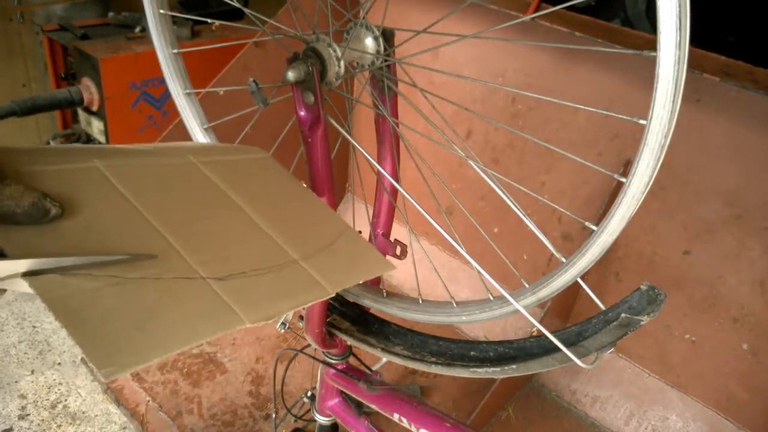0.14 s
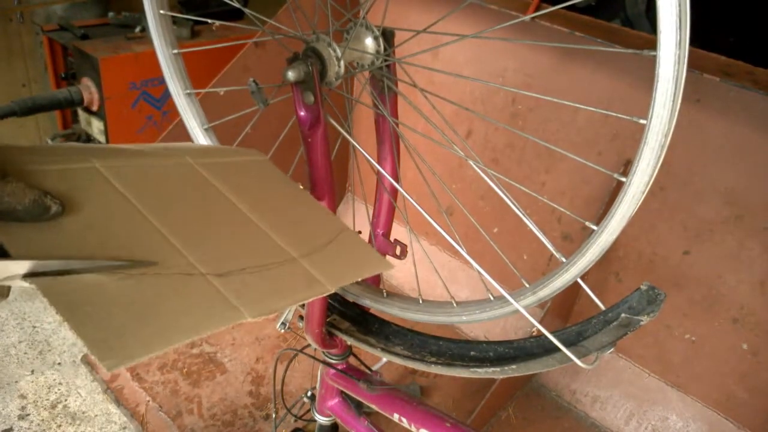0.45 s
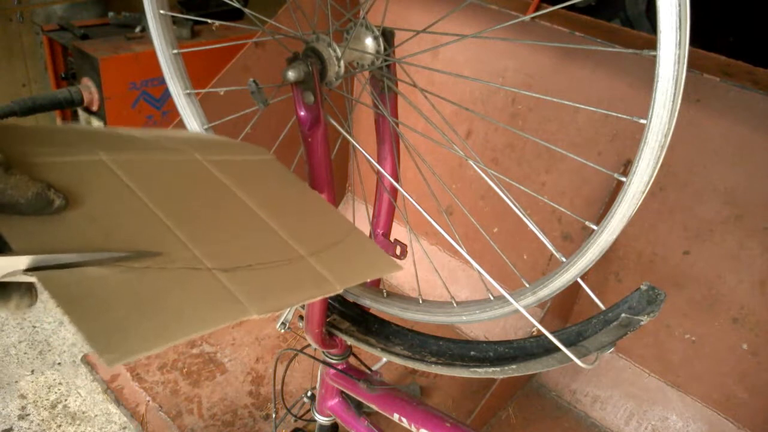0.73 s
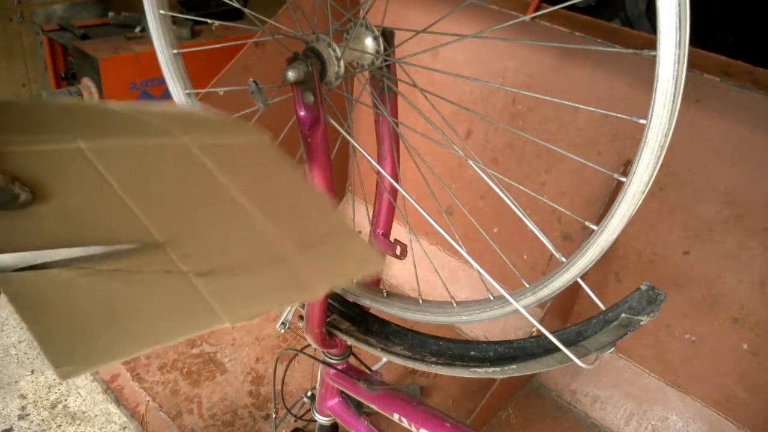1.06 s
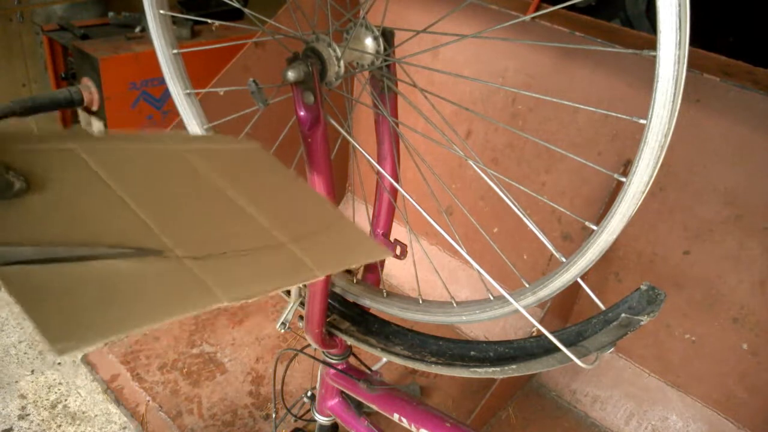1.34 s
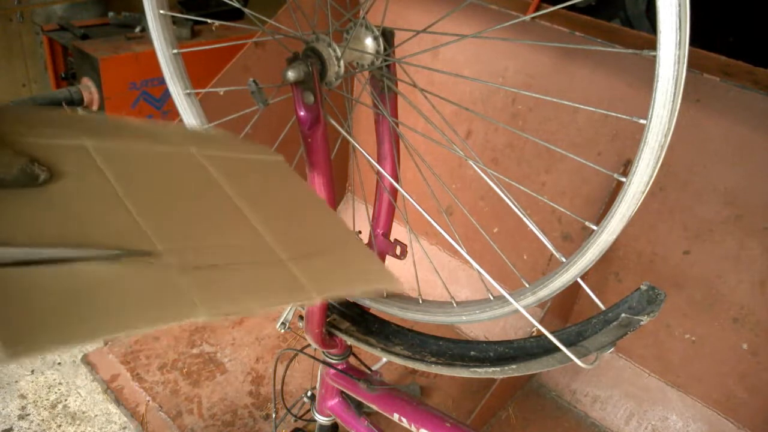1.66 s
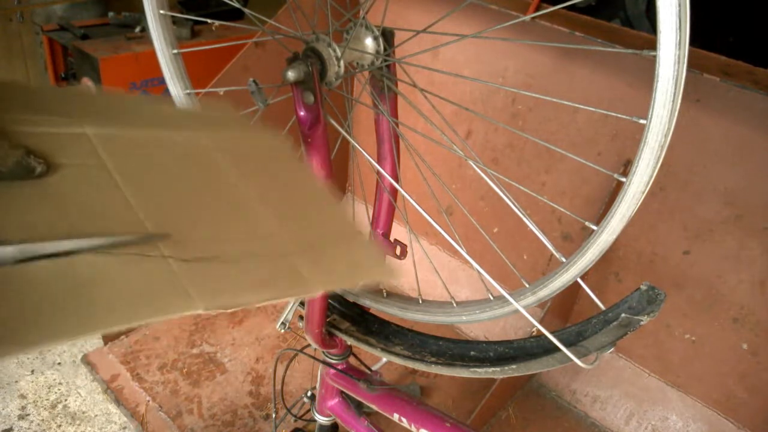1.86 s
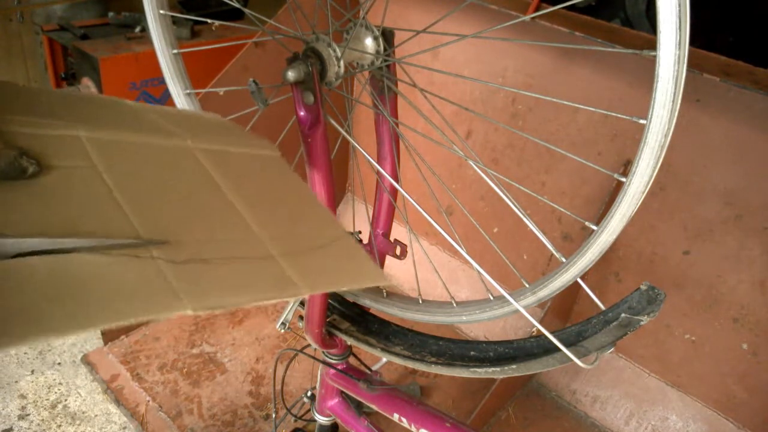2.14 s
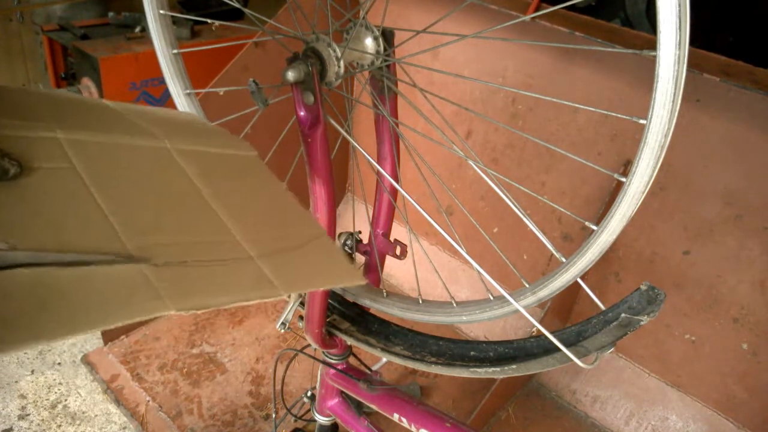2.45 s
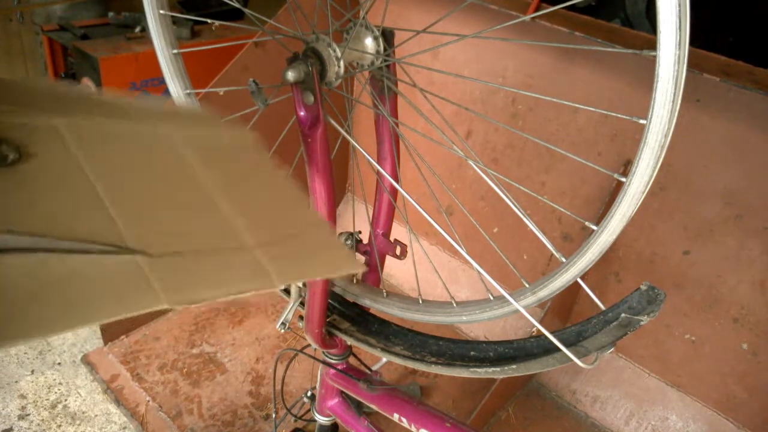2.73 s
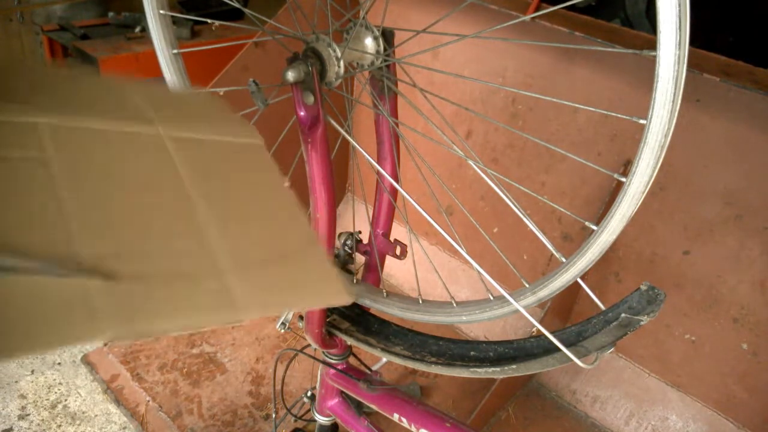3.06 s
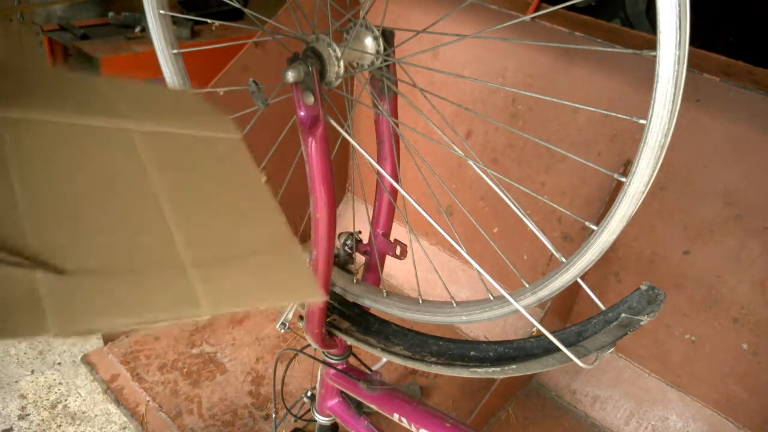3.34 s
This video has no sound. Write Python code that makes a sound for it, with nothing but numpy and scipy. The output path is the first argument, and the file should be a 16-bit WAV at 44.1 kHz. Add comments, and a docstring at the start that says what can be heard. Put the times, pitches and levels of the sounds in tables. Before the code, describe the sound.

Scissors cut corrugated cardboard close by in a small workshop. A light snip at 0.3 seconds is followed by soft blade sliding, then a thumping crunch at about 1.2 seconds. A dry scrape comes at 1.7 seconds, and two sharp crunches at 2.2 and 2.5. Another crackling cut at about 3.1 seconds trails into cardboard rubbing until 3.5. A quiet, low rumble lies underneath.

```python
"""Crunches, thumps and dry scrapes: scissors cut hand-held corrugated cardboard in a small workshop.
Each bite crushes fibres until the flutes (the wavy ridges inside) crack, making the sheet thump
and ring. Between bites the blades slide along the slit and the sheet rubs and creaks.
It all happens close by, over a quiet, low rumble."""
import sys
import numpy as np
from scipy import signal
from scipy.fft import rfft, irfft
from scipy.io import wavfile

SR = 44100
rng = np.random.default_rng(int(sys.argv[2]) if len(sys.argv) > 2 else 0)


def wav_out(sig):
    """Save sig, one row per channel (or a flat mono array), as 16-bit PCM at SR to the path in sys.argv[1]."""
    wavfile.write(sys.argv[1], SR, np.round(np.clip(np.atleast_2d(sig).T, -1, 1) * 32767).astype(np.int16))


N = 154350
TIME = np.arange(N) / SR
BITE_GRAINS_PER_S, BITE_SPREAD_DB = 2600, 2.83

# a flute gives way: t/s, length/s, thump/dB, hollow body/dB, crunch/dB, bright edge/dB
FLUTE_CRACKS = [(.331, 0.013, -43, -36.5, -42, -35), (0.4016, 0.0066, -55, -42, -49, -47.5),
                (1.122, 0.0051, -63, -68, -54, -56), (1.141, .013, -58, -38, -58, -34),
                (1.19, 0.011, -40, -41, -49, -35.5), (1.213, 0.0069, -46, -50, -56, -39),
                (1.2393, 0.0071, -25.5, -27, -29, -24.5), (1.256, 0.0035, -31.5, -37.5, -38, -45),
                (2.218, 0.0045, -64, -44, -41, -37.5), (2.232, 0.0091, -50, -35.5, -44, -43),
                (2.248, 0.0093, -38, -36.5, -22.5, -27.5), (2.2717, 0.0057, -41, -31.5, -33.5, -29),
                (2.428, 0.0064, -42, -37.5, -42, -44), (2.440, 0.0064, -39.5, -37, -61, -40.5),
                (2.479, 0.0072, -33, -21.5, -20, -21.5), (2.869, 0.0072, -74, -63, -57, -59.5),
                (3.09, 0.0092, -53, -34, -42, -44), (3.1224, 0.0046, -60, -23, -25, -31),
                (3.175, 0.0021, -42.5, -23.5, -54, -56)]
# tone colours of the cardboard (how strong each pitch is): f/Hz, level/dB
BODY_COLOUR = [(100, -27), (250, -5), (450, -8.5), (610, -1.5), (800, -6), (1100, -10), (1600, -21),
               (4000, -55)]
CRUNCH_COLOUR = [(300, -44.5), (900, -3.5), (1400, 0.5), (1900, 2.5), (2500, -2.5), (3400, -1), (4800, -3),
                 (7000, -5.5), (16000, -34.5)]
EDGE_COLOUR = [(800, -20.5), (2500, -7), (4300, -4), (6500, 3), (8500, -2), (11000, -1), (13500, -6.5),
               (16000, -13.5)]
HISS_COLOUR = [(800, -37), (2500, -10.5), (4000, -1), (6200, 1), (8200, 0), (10200, 2), (12500, -1.5),
               (16000, -10)]
# pitches at which the sheet rings: f/Hz, width/Hz, level/dB
SHEET_RINGS = [(171.3, 10, 8), (211.4, 8.1, -0.5), (604, 33, 3.5), (642, 22, -0.5), (730, 37, -12.5),
               (827, 62, -2.5), (1047, 9.3, -2.5), (1361, 18, -0.5), (1828, 39, -9), (1979, 50, -0.5),
               (2240, 87, -6.5), (3280, 17, -6), (3585, 130, -6.5), (4440, 95, -2.5), (5900, 120, -18.5)]


def from_db(db):
    """Turn decibels into a number to multiply by."""
    return 10 ** (np.asarray(db) / 20)


def rms_one(x):
    """Scale a signal so that its average strength (rms) is 1."""
    return x / np.sqrt(np.mean(x ** 2) + 1e-20)


def at_hz(table, hz, column=1):
    """Read between a table's rows along a pitch scale (log frequency)."""
    table = np.array(table)
    return np.interp(np.log(np.maximum(hz, 1)), np.log(table[:, 0]), table[:, column])


def swell(peak_s, rise_s, fall_s):
    """A smooth rise and fall around one moment."""
    distance = (TIME - peak_s) / np.where(TIME < peak_s, rise_s, fall_s)
    return np.exp(-np.minimum(distance ** 2, 20))


def resonate(x, hz, width_hz):
    """Make a signal ring at one pitch; a narrower width rings longer."""
    r = np.exp(-np.pi * width_hz / SR)
    gain = (1 - r * r) / 2
    feedback = [1, -2 * r * np.cos(2 * np.pi * hz / SR), r * r]
    return signal.lfilter([gain, 0, -gain], feedback, x + 1e-18)


def tap_response(colour, rings=(), size=8192):
    """The sound of one tap on something with this colour and these rings, scaled to energy 1."""
    freqs = np.arange(size // 2 + 1) * SR / size
    cepstrum = irfft(np.log(from_db(at_hz(colour, freqs))))
    # fold the second half onto the first, so nothing sounds before the tap
    cepstrum[1:size // 2] *= 2
    cepstrum[size // 2 + 1:] = 0
    tap = irfft(np.exp(rfft(cepstrum)))
    tap = tap + sum(from_db(db) * resonate(tap, hz, width) for hz, width, db in rings)
    return tap / np.sqrt(np.sum(tap ** 2))


def grains(per_s, spread_db):
    """Tiny breaks: clicks of uneven size at random moments."""
    sizes = from_db(spread_db * np.minimum(rng.exponential(1, N), 4))
    hits = rng.random(N) < per_s / SR
    return rms_one(hits * sizes * rng.choice([-1, 1], N))


def through_sheet(force, colour):
    """A force heard through the ringing cardboard."""
    return signal.fftconvolve(force, tap_response(colour, SHEET_RINGS))[:N]


def crackle(shapes, levels_db, colours, per_s, spread_db):
    """Grains follow each movement's loudness shape and sound through the sheet, one level per colour."""
    powers = from_db(levels_db).T ** 2 @ np.array(shapes) ** 2
    return sum(through_sheet(grains(per_s, spread_db) * np.sqrt(power), colour)
               for power, colour in zip(powers, colours))


def background(air_db=-59.5):
    """Quiet air with a wavering low rumble, and a low hum as the hand-held sheet flaps slowly."""
    # colour of the air's steady noise: f/Hz, level/dB
    air_colour = [(20, -6), (36, 1), (65, 1.5), (110, -6), (250, -9), (600, -12), (1200, -17),
                  (3000, -25.5), (8000, -31), (12500, -33), (16000, -33.5)]
    # low hums come and go (a distant rumble, and the sheet flapping in the hand near 1 s): peak t/s, rise/s,
    # fall/s, f/Hz, width/Hz, level/dB
    rumbles = [(1.4, 2.1, 2.4, 36, 5.7, -52.5), (1.03, 0.3, 0.34, 56, 3.6, -50.5)]
    air = signal.fftconvolve(rng.standard_normal(N + SR), tap_response(air_colour))
    out = from_db(air_db) * rms_one(air[SR:SR + N])
    for *timing, hz, width, db in rumbles:
        noise = rng.standard_normal(N + SR)
        rumble = resonate(resonate(noise, hz, width), hz, width)[SR:]
        out += from_db(db) * swell(*timing) * rms_one(rumble)
    return out


def workshop_echo(x, size=24000):
    """Sound bounces around the room, each band of pitches dying away at its own speed."""
    # the room's echo: f/Hz, time to fade by 60 dB/s, level/dB
    room = [(80, 0.099, -13), (245, 0.59, -9.5), (640, 0.24, -8.5), (1690, 0.3, -10.5), (3870, 0.25, -15),
            (8000, 0.17, -16.5), (15000, .13, -14.5)]
    t, tail = TIME[:size], 0
    edges_hz = np.geomspace(45, 18000, 11)
    fade_in = np.clip((t - .003) / 0.009, 0, 1)
    for low, high in zip(edges_hz, edges_hz[1:]):
        hz = np.sqrt(low * high)
        band_pass = signal.butter(2, [low, high], "band", fs=SR, output="sos")
        band = signal.sosfilt(band_pass, rng.standard_normal(size))
        band = band * fade_in * from_db(-60 * t / at_hz(room, hz))
        band *= np.sqrt(2 * (high - low) / SR / np.sum(band ** 2))  # energy in step with band width
        tail = tail + from_db(at_hz(room, hz, column=2)) * band
    return signal.fftconvolve(x, tail)[:N]


def creaks():
    """Card or steel catches as it rubs and briefly rings around one pitch; a few rows are the sheet itself
    ringing after a crack strikes it."""
    # a rub catches, or (the 2.488 s rows at 604 Hz and 208 Hz) the sheet rings after a crack strikes it: peak
    # t/s, rise/s, fall/s, f/Hz, width/Hz, level/dB
    catches = [(.036, .022, 0.016, 11500, 2500, -52), (.338, 0.014, 0.035, 610, 350, -45.5),
               (0.969, 0.058, 0.028, 2070, 900, -53.5), (1.21, 0.043, 0.092, 994, 344, -42.5),
               (1.575, .025, 0.029, 3060, 900, -49.5), (1.691, 0.068, 0.035, 1286, 200, -50),
               (1.74, 0.11, 0.025, 1060, 120, -49.5), (1.792, .02, 0.016, 1476, 200, -47),
               (2.136, 0.0054, 0.025, 6200, 900, -47), (2.265, 0.02, 0.047, 1960, 497, -44),
               (2.49, .008, 0.074, 1700, 1100, -41), (2.488, 0.0029, 0.041, 604, 109, -33.5),
               (2.488, 0.0066, .03, 208, 159, -39.5), (2.685, 0.022, 0.026, 580, 86, -48),
               (2.955, 0.011, 0.021, 11600, 2470, -42), (3.04, 0.032, .03, 603, 90, -55),
               (3.13, 0.0044, 0.07, 3060, 1990, -47)]
    out = 0
    for *timing, hz, width, db in catches:
        chafing = grains(BITE_GRAINS_PER_S, BITE_SPREAD_DB)
        ring = rms_one(resonate(resonate(chafing, hz, width), hz, width))
        out = out + from_db(db) * ring * swell(*timing)
    return out


def sheet_bounce(x, delay_s=0.00081, sway_share=0.21, sways_per_s=7, bounce_db=-13.5):
    """Sound bounces off the swaying sheet; the changing delay shifts its colour."""
    sway = np.interp(TIME * sways_per_s, np.arange(N), rng.uniform(-0.86, 1, N))
    delayed = np.interp(TIME - delay_s * (1 + sway_share * sway), TIME, x)
    gain = from_db(bounce_db)
    return (x - gain * delayed) / np.hypot(1, gain)


def slides(flutter_db=1.5, flutters_per_s=99):
    """Steel rubs on card, swelling with each push; uneven friction makes it flutter."""
    # pushes: peak t/s, rise/s, fall/s, hollow body/dB, rasp/dB, hiss/dB
    pushes = [(0.037, 0.029, 0.021, -63, -60, -46.5), (.335, 0.013, 0.016, -53, -50.5, -39.5),
              (0.415, 0.0042, .014, -58, -66, -63), (.10, 0.01, 0.015, -75, -79, -91),
              (.59, 0.05, 0.055, -66, -59, -67), (.73, 0.061, 0.046, -85, -65, -70.5),
              (0.802, 0.02, 0.042, -58.5, -54, -40), (.853, 0.026, 0.038, -62, -58, -39),
              (.925, 0.04, 0.03, -62.5, -56, -40.5), (0.966, 0.036, 0.022, -58.5, -49, -46),
              (1.13, .03, 0.029, -62, -64, -57.5), (1.428, .022, .022, -73, -52, -47),
              (1.563, 0.019, 0.019, -56, -51.5, -47.5), (1.591, 0.029, 0.015, -66, -61, -48),
              (1.683, 0.023, 0.023, -43, -34, -30.5), (1.73, 0.066, 0.066, -57.5, -46.5, -45),
              (1.782, 0.037, 0.024, -50.5, -44, -45), (2.038, 0.024, 0.017, -68, -48, -48.5),
              (2.70, 0.02, 0.03, -54.5, -55.5, -53.5), (2.778, 0.01, 0.016, -57, -55.5, -70),
              (2.876, 0.0089, 0.061, -58, -59.5, -72), (2.954, .011, .04, -55, -47.5, -46),
              (3.02, .05, 0.037, -49, -55, -52.5), (3.094, 0.039, 0.018, -42, -37.5, -41.5),
              (3.155, 0.022, 0.029, -50, -49, -73), (3.265, 0.036, 0.024, -39, -36.5, -38.5),
              (3.321, .02, 0.023, -44.5, -52, -53), (3.402, 0.022, 0.023, -51.5, -49.5, -53.5),
              (3.495, .02, 0.038, -56.5, -50, -51)]
    # hollow and raspy colours of rubbing: f/Hz, level/dB
    hollow_colour = [(100, -22), (250, -1.5), (450, -2), (610, -2), (760, -2.5), (1050, -6), (1600, -12.5),
                     (4000, -44)]
    rasp_colour = [(300, -23), (800, -9), (1250, 3.5), (1700, -5.5), (2400, -1.5), (3500, -3.5),
                   (5000, -8.5), (8000, -13), (16000, -19)]
    flutter = np.interp(TIME * flutters_per_s, np.arange(N), rng.standard_normal(N))
    shapes = [swell(*push[:3]) * from_db(flutter_db * flutter) for push in pushes]
    levels_db = [push[3:] for push in pushes]
    colours = (hollow_colour, rasp_colour, HISS_COLOUR)
    return crackle(shapes, levels_db, colours, per_s=14000, spread_db=2.27)


def snaps(fade_s=0.0007):
    """Single stiff fibres break with a bright tick."""
    # a fibre breaks: t/s, level/dB
    breaks = [(.412, -36), (1.122, -43), (1.2813, -26), (1.299, -38), (1.3255, -45), (1.3413, -41.5),
              (2.320, -34), (2.459, -37), (2.559, -41), (2.776, -48), (3.018, -25), (3.031, -34),
              (3.103, -25), (3.147, -31), (3.415, -34.5), (3.447, -39), (3.479, -40.5)]
    force = np.zeros(N)
    for start, db in breaks:
        fade = np.exp(-np.minimum(abs(TIME - start) / fade_s, 20))
        force += from_db(db) * (TIME >= start) * fade
    return through_sheet(force * rng.choice([-1, 1], N), HISS_COLOUR)


def thumps(size=8192):
    """The whole sheet swings whenever a flute gives way or a bend lets go."""
    # low notes of the bending sheet: f/Hz, time to fade by 60 dB/s, level/dB
    low_notes = [(64.6, 0.12, -3.5), (129.4, .13, -2.5), (151.2, 0.19, -1), (213, 0.19, -9.5)]
    # the bent sheet lets go: t/s, thump/dB
    releases = [(1.152, -42), (1.172, -50), (1.203, -32.5), (2.26, -45), (2.494, -46)]
    out, t = np.zeros(N + size), TIME[:size]
    swing = sum(from_db(db - 60 * t / fade_s) * np.sin(2 * np.pi * hz * t) for hz, fade_s, db in low_notes)
    crack_thumps = [(start_s, db) for start_s, _, db, *_ in FLUTE_CRACKS]
    for start_s, db in releases + crack_thumps:
        start = int(start_s * SR)
        out[start:start + size] += from_db(db) * swing
    return out[:N]


def bites(rise_s=0.0064, fade_s=0.013):
    """Crushed fibres crackle coarsely for as long as the blades press."""
    # the blades squeeze: start/s, end/s, thump/dB, hollow body/dB, crunch/dB, bright edge/dB
    squeezes = [(0.295, 0.372, -62, -52.5, -56, -53), (0.378, 0.439, -49.5, -48.5, -63.5, -64),
                (1.141, 1.173, -38, -52, -55, -46), (1.204, 1.22, -33.5, -52, -53, -43),
                (1.232, 1.301, -43.5, -43.5, -44, -47.5), (2.217, 2.276, -42.5, -46.5, -40.5, -42.5),
                (2.421, 2.468, -53, -50, -50.5, -50), (2.474, 2.552, -55, -46.5, -45.5, -52.5),
                (3.012, 3.109, -64, -49.5, -49.5, -41.5), (3.127, 3.158, -52, -45.5, -53, -50)]
    # deep colour of the squeezed sheet: f/Hz, level/dB
    thump_colour = [(25, -17), (55, 1.5), (90, 6), (125, 0), (165, -4.5), (215, -13), (300, -28.5),
                    (700, -53)]
    shapes = []
    for start, end, *_ in squeezes:
        rise = np.clip((TIME - start) / rise_s, 0, 1)
        fade = np.exp(-np.clip((TIME - end) / fade_s, 0, 20))
        shapes.append(rise * fade)
    levels_db = [squeeze[2:] for squeeze in squeezes]
    colours = (thump_colour, BODY_COLOUR, CRUNCH_COLOUR, EDGE_COLOUR)
    return crackle(shapes, levels_db, colours, BITE_GRAINS_PER_S, BITE_SPREAD_DB)


def cracks(rise_share=0.26, crumble_db=-16, crumble_s=0.016, size=4096):
    """Each flute collapses in a quick burst of tiny breaks, then crumbles a little longer."""
    out, t = np.zeros(N + 4 * size), TIME[:size]
    colours = (BODY_COLOUR, CRUNCH_COLOUR, EDGE_COLOUR)
    taps = [tap_response(colour, SHEET_RINGS)[:size] for colour in colours]
    fibres = grains(per_s=13000, spread_db=2.84)
    crumble = from_db(crumble_db) * np.exp(-t / crumble_s)
    for k, (start_s, length_s, _, *levels_db) in enumerate(FLUTE_CRACKS):
        start = int(start_s * SR)
        rise = np.minimum(t / (rise_share * length_s), 1)
        burst = rise * (np.exp(-(t / length_s) ** 4) + crumble)
        force = burst * fibres[k * size:(k + 1) * size]
        for tap, db in zip(taps, levels_db):
            sound = signal.fftconvolve(force, tap)
            sound *= np.sqrt(np.sum(burst ** 2) / np.sum(sound ** 2))  # same energy as the burst
            out[start:start + len(sound)] += from_db(db) * sound
    return out[:N]


def scene():
    """The cutting, its echo and the background, in one channel."""
    cutting = cracks() + thumps() + snaps() + bites() + sheet_bounce(slides()) + creaks()
    return (cutting + workshop_echo(cutting) + background())[None]


def record(dry):
    """A steep filter removes the very highest treble."""
    cutoff_hz = 15900
    return signal.sosfilt(signal.ellip(10, .3, 70, cutoff_hz, fs=SR, output="sos"), dry)


dry = scene()
out = record(dry)
wav_out(out)
```